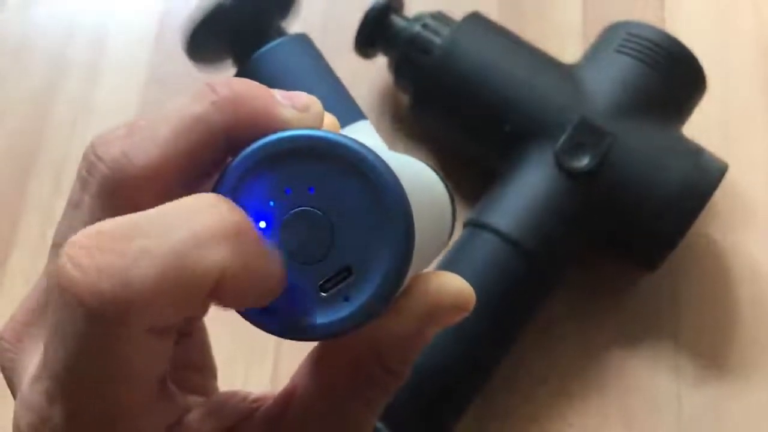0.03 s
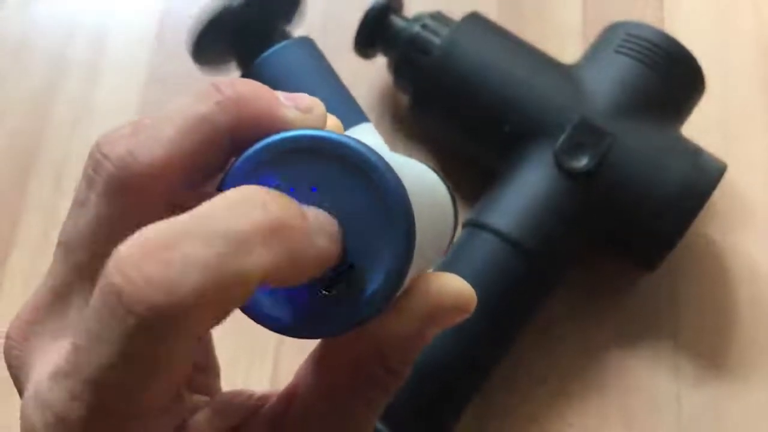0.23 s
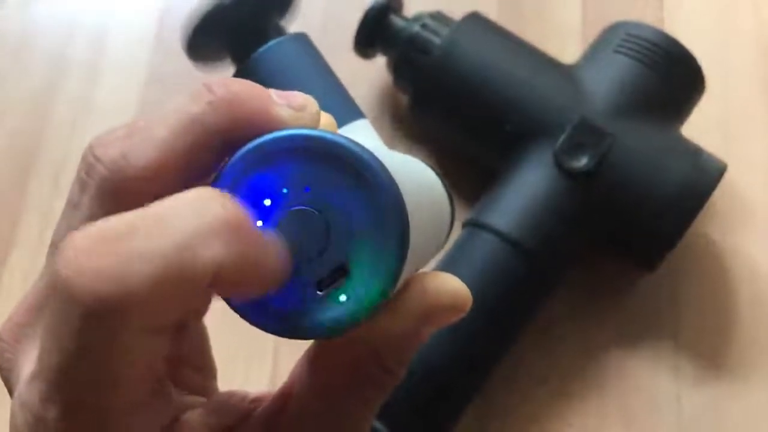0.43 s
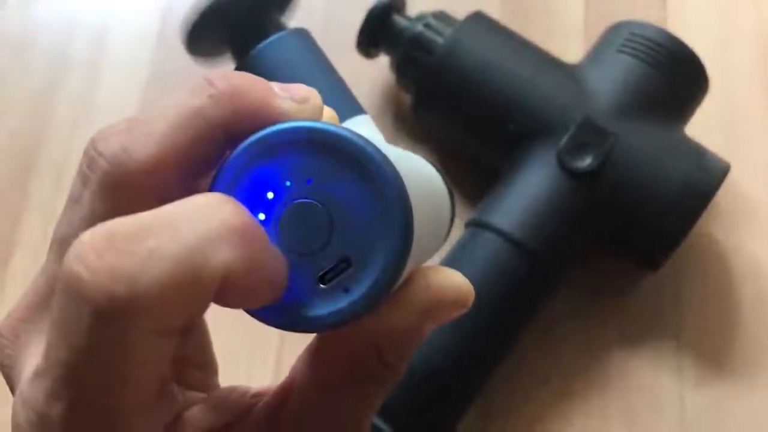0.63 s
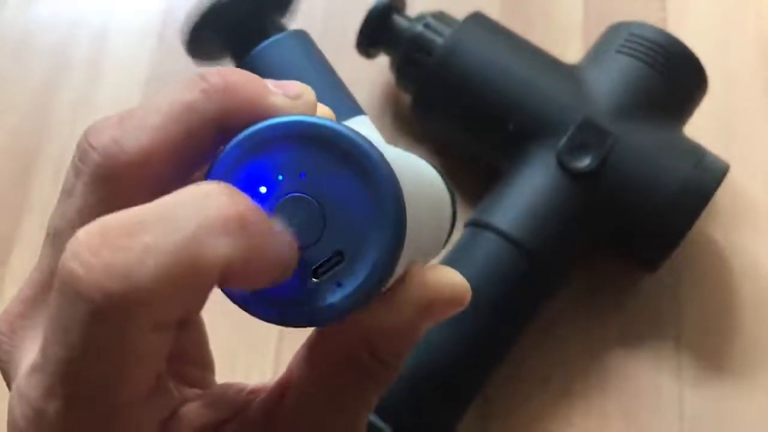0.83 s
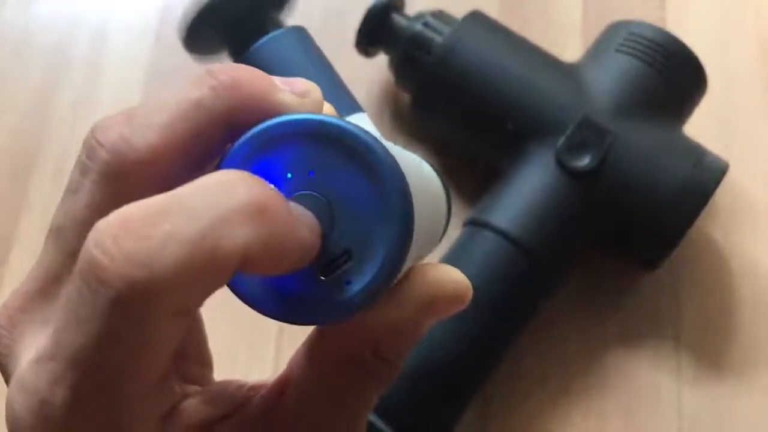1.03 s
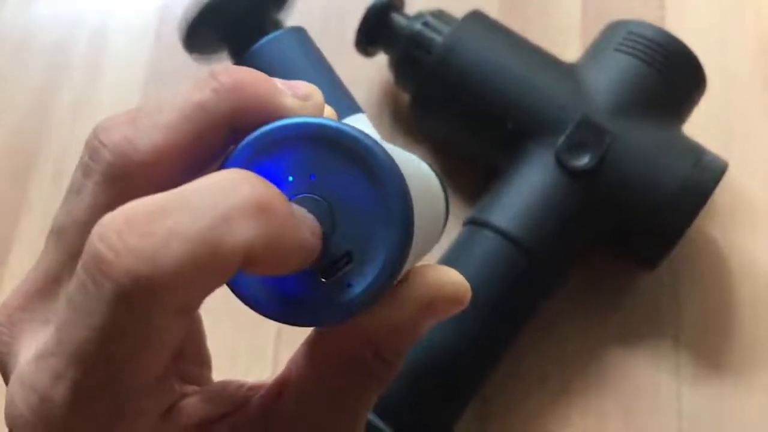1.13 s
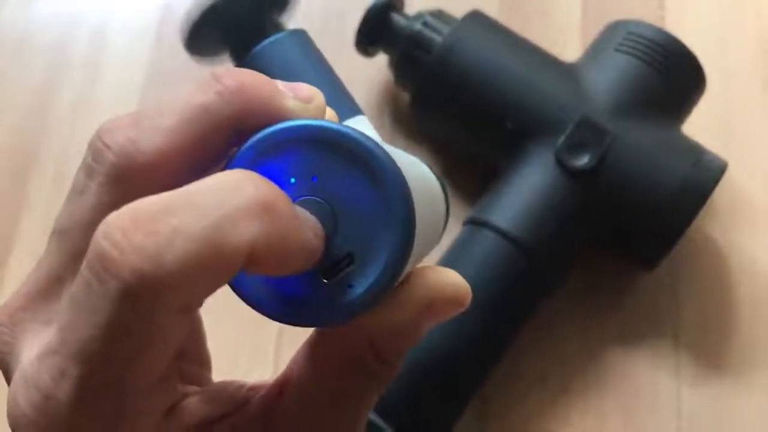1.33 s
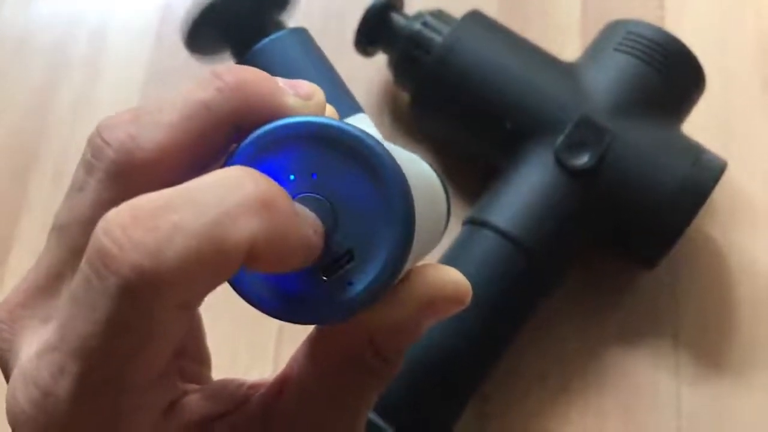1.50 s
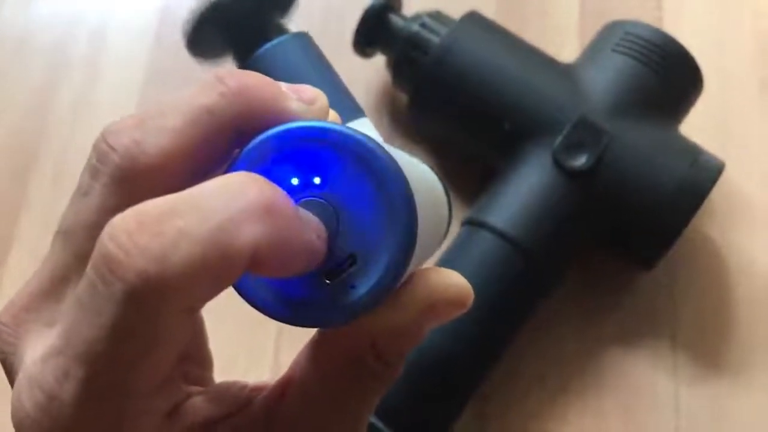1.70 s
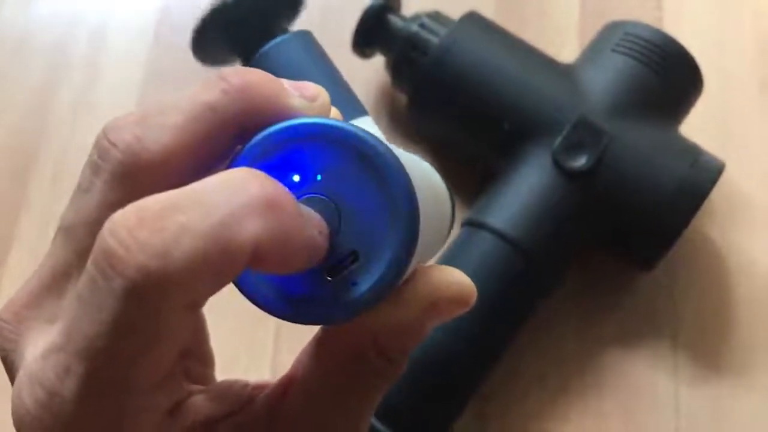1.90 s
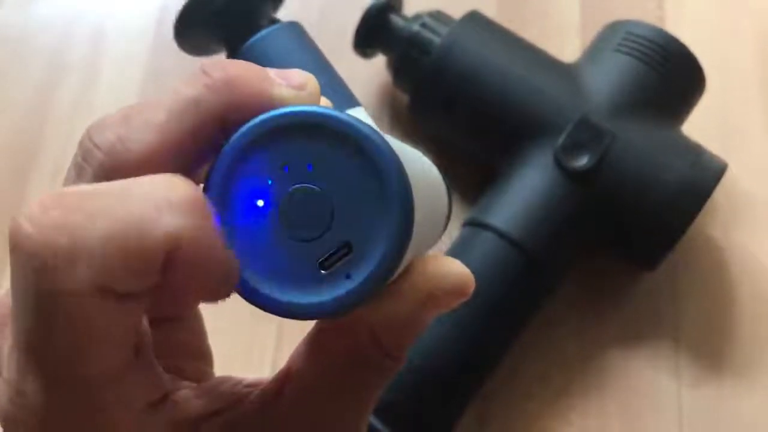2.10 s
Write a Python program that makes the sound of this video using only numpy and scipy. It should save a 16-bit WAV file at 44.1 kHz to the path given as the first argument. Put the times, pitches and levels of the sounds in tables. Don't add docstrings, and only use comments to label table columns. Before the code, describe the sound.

Handheld massage gun motor whirring with rapid knocking, one loud button click, then a quick wind-down

```python
import sys
import numpy as np
from scipy import signal
from scipy.fft import rfft, irfft
from scipy.io import wavfile

SR = 44100
rng = np.random.default_rng(int(sys.argv[2]) if len(sys.argv) > 2 else 0)


def decibels_to_gain(level_db):
    exponent = np.asarray(level_db, float) / 20
    return 10 ** exponent


def wav_record(signal):
    frames = np.transpose(np.atleast_2d(signal))
    bounded = np.clip(frames, -1, 1)
    quanta = np.round(bounded * 32767).astype(np.int16)
    wavfile.write(sys.argv[1], SR, quanta)


N = 94815

# frequency_hz, density_db
FLOOR_SPECTRUM = [(15, -66), (25, -6), (108, -7), (394, -12.5), (427, -13.5), (463, -14.5), (988, -17.5),
                  (1290, -21), (16000, -38.5)]
# frequency_hz, width_hz, level_db
HUM_BANDS = [(120, 22, -70), (76, 25, -73), (267, 15, -77), (980, 30, -75)]
# time_s, speed_turns_per_s
SHAFT_SPEED = [(0.0, 35.68), (0.1, 35.19), (0.2, 34.75), (0.3, 34.4), (0.4, 33.99), (0.5, 34.33),
               (0.65, 35.12), (0.8, 35.74), (1.0, 36.49), (1.2, 37.05), (1.4, 37.55), (1.62, 37.98),
               (1.7, 26.9), (1.78, 19.42), (1.86, 9.11), (1.95, -5.45)]
TONE_MULTIPLES = [21, 35, 37, 42, 44, 63, 84, 112, 116, 126, 168, 182, 196, 3]
# level_db, pressed_gain_db, waver_db
TONE_LEVELS = [(-72, 5, 1), (-62, -3, 1.5), (-65, 0, 1.5), (-48.5, 0, 1), (-59, 0, 3), (-72, 0, 1.5),
               (-66, -7, 1.5), (-68, 13, 1.5), (-84, 24.5, 2), (-76, -3, 2), (-79, 0, 2), (-88, 11, 2),
               (-79, 0, 2), (-72, 0, 2.5)]
KNOCK_PLACES = [(.545, 1), (.035, -1), (.66, 1), (.87, -1)]
# shell_db, thump_db
KNOCK_LEVELS = [
    (-38, -40),
    (-39.5, -47.5),
    (-46.5, -60.5),
    (-52, -51),
]
# frequency_hz, level_db, t60_s
THUMP_MODES = [(620, -1, .018), (860, 0, .022), (980, -2, .035), (1080, -6, .025)]
# frequency_hz, level_db, t60_s
SHELL_MODES = [(1270, -6, .02), (1580, -3, .03), (1850, -6, .014), (2350, -8, .018), (2750, -9, .014),
               (3200, 0, .013), (3750, -8, .012), (4750, -13, .01)]
# frequency_hz, width_hz, level_db
RATTLE_BANDS = [(646, 68, -13), (985, 43, -8.5), (1252, 450, -4.5), (1700, 276, -2), (1970, 200, -16.5),
                (2287, 180, -18), (2900, 612, -5.5), (3230, 900, -13), (3800, 86, -18.5)]
# frequency_hz, width_hz, level_db
FIZZ_BANDS = [(4290, 260, 5), (5100, 700, -5), (5850, 800, -5), (7250, 700, 0), (8050, 350, -5),
              (9200, 600, -10), (11900, 400, -16), (14000, 500, -16)]
# start_s, peak_db, pitch_factor, ring_factor, crack_db
CLICKS = [
    (.2461, -5.5, 1.0, 1.0, -19),
    (1.0315, -37, .92, 1.3, -14),
]
# start_s, peak_db, pitch_factor, ring_factor, crack_db
RELEASES = [
    (.4024, -22.5, 1.0, 1.0, -9),
    (.4063, -33, 1.07, 1.0, -8),
    (1.9824, -34.5, .9, 1.2, -3),
    (1.9875, -46, .74, 1.6, -3),
    (1.999, -53, .92, 1.5, -3),
]
# frequency_hz, level_db, t60_s
DOME_DOWN_MODES = [(270, -32, .025), (620, -33, .012), (1100, -25, .01), (1900, -23, .008),
                   (2870, -10, .011), (3830, -8, .011), (5170, -4, .014), (5900, -6, .007), (6450, 0, .008),
                   (7300, -10, .007)]
# frequency_hz, level_db, t60_s
DOME_UP_MODES = [(300, -25, .02), (1000, -15, .009), (2000, -16, .008), (3850, -7, .008), (5240, -4, .011),
                 (7970, 0, .012), (8500, -2, .016), (10800, -12, .011), (12400, -12, .01),
                 (15000, -14, .009)]


def evened(x):
    return x / np.sqrt(np.mean(x ** 2) + 1e-20)


def resonate(x, hz, width_hz):
    r = np.exp(-np.pi * width_hz / SR)
    pole = r * np.exp(2j * np.pi * hz / SR)
    return 2 * signal.lfilter([1 - r], [1, -pole], x).real


def noise_band(source, hz, width_hz):
    return evened(resonate(resonate(source, hz, width_hz), hz, 2 * width_hz))


def coloured(beat, bands):
    return evened(sum(decibels_to_gain(db) * noise_band(beat * rng.standard_normal(N), hz, width_hz)
                      for hz, width_hz, db in bands))


def drift(top_hz):
    return evened(resonate(resonate(rng.standard_normal(N), 0, top_hz), 0, top_hz))


def ring(modes, pitch=1, length=1, rise_s=0.0006):
    t = np.arange(3000) / SR
    x = np.zeros(3000)
    for k, (hz, db, t60_s) in enumerate(modes):
        decay = decibels_to_gain(db - 60 * t / (t60_s * length))
        x += (-1) ** k * decay * np.sin(2 * np.pi * hz * pitch * t)
    x *= np.sin(np.pi / 2 * np.minimum(t / rise_s, 1)) ** 2
    return x / abs(x).max()


def motion():
    start_turn = .02
    off_s, off_fade_s = 1.62, .005
    press_s, press_rise_s = .93, .3
    t = np.arange(N) / SR
    speed = np.maximum(np.interp(t, *np.transpose(SHAFT_SPEED)), 0)
    turns = start_turn + np.cumsum(speed) / SR
    drive = np.exp(-np.maximum(t - off_s, 0) / off_fade_s)
    pressed = np.clip((t - press_s) / press_rise_s, 0, 1)
    return t, speed / speed.max(), turns, drive, pressed


def floor():
    floor_db, waver_db = -63, 0.27
    hz = np.fft.rfftfreq(N, 1 / SR)
    f, db = np.transpose(FLOOR_SPECTRUM)
    spectrum = decibels_to_gain(np.interp(np.log(hz + 1), np.log(f + 1), db))
    tone = irfft(rfft(rng.standard_normal(N)) * spectrum, N)
    hum = sum(decibels_to_gain(level_db) * noise_band(rng.standard_normal(N), centre_hz, width_hz)
              for centre_hz, width_hz, level_db in HUM_BANDS)
    return decibels_to_gain(floor_db + waver_db * drift(top_hz=1.5)) * evened(tone) + hum


def whine():
    cap_hz, cap_width_hz = 1570, 115
    lock_turn = .67
    phase_wander_turns = .025
    load_swing, load_place = .3, .6
    t, speed, turns, drive, pressed = motion()
    shaft_hz = np.gradient(turns) * SR
    since_knock = turns - KNOCK_PLACES[0][0]
    out = np.zeros(N)
    for k, (db, press_db, waver_db) in zip(TONE_MULTIPLES, TONE_LEVELS):
        main = abs(k - 43) < 2
        lift = 1 / np.sqrt(1 + ((k * shaft_hz - cap_hz) / cap_width_hz * 2) ** 2) if main else 1
        level = decibels_to_gain(db + press_db * pressed + waver_db * drift(top_hz=14)) * lift * np.sqrt(2)
        start = lock_turn if main else rng.random()
        phase_turns = k * since_knock + start + phase_wander_turns * drift(top_hz=29.4)
        out += level * np.sin(2 * np.pi * phase_turns)
    load = 1 + load_swing * np.cos(2 * np.pi * (turns - load_place))
    return out * drive * load


def crank():
    speed_law, rise_s = .75, .0006
    spread_db, jitter_s = 1.2, .00002
    thump_lead_s = .0028
    thump_db, thump_press_db, thump_drive_db = -11.25, 3, 4.5
    t, speed, turns, drive, pressed = motion()
    taps, thumps = np.zeros(N), np.zeros(N)
    for (place, sign), (shell_db, body_db) in zip(KNOCK_PLACES, KNOCK_LEVELS):
        at = np.interp(np.arange(turns[-1] - place) + place, turns, t)
        chance = rng.standard_normal((80, 2))[:len(at)]
        size = sign * decibels_to_gain(spread_db * chance[:, 0]) * np.interp(at, t, speed) ** speed_law
        at = at + jitter_s * chance[:, 1]
        tap_index = np.clip((at * SR).astype(int), 0, N - 1)
        thump_index = np.clip(((at - thump_lead_s) * SR).astype(int), 0, N - 1)
        taps[tap_index] += size * decibels_to_gain(shell_db)
        thumps[thump_index] += size * decibels_to_gain(body_db)
    thumps *= decibels_to_gain(thump_db + thump_press_db * pressed + thump_drive_db * drive)
    shell = signal.oaconvolve(taps, ring(SHELL_MODES, rise_s=rise_s))
    body = signal.oaconvolve(thumps, ring(THUMP_MODES, rise_s=2 * rise_s))
    return (shell + body)[:N]


def rattle():
    rattle_db, rattle_drive_db, rattle_law = -58, 3, 0.89
    fizz_db, fizz_drive_db, fizz_law = -62, 4, 1.8
    beat_depth, air_db = 0.38, -5.5
    t, speed, turns, drive, pressed = motion()
    beat = 1 + beat_depth * np.cos(2 * np.pi * (turns - .06)) ** 6
    body = decibels_to_gain(rattle_db + rattle_drive_db * drive) * speed ** rattle_law * coloured(beat, RATTLE_BANDS)
    bright = np.diff(beat * rng.standard_normal(N), prepend=0)
    air = decibels_to_gain(air_db) * evened(bright + beat * rng.standard_normal(N))
    fizz_level = decibels_to_gain(fizz_db + fizz_drive_db * drive) * speed ** fizz_law
    fizz = fizz_level * (coloured(beat, FIZZ_BANDS) + air)
    return decibels_to_gain(.6 * drift(top_hz=6)) * (body + fizz)


def room(x):
    level_db, t60_s, top_hz = -25, .25, 7400
    t = np.arange(SR // 3) / SR
    tail = resonate(rng.standard_normal(len(t)), 0, top_hz) * decibels_to_gain(-60 * t / t60_s)
    tail *= t > .004
    return decibels_to_gain(level_db) * signal.fftconvolve(x, tail / np.linalg.norm(tail))[:N]


def button(rows, modes):
    crack_hz, crack_width_hz, crack_t60_s, rise_s = 7200, 6000, .015, .0004
    t = np.arange(3000) / SR
    out = np.zeros(N + 3000)
    for start_s, peak_db, pitch, length, crack_db in rows:
        crack = resonate(rng.standard_normal(3000), crack_hz, crack_width_hz)
        crack *= decibels_to_gain(crack_db - 60 * t / (crack_t60_s * length))
        snap = ring(modes, pitch, length, rise_s) + np.minimum(t / rise_s, 1) * crack
        out[round(start_s * SR):][:3000] += decibels_to_gain(peak_db) * snap
    return out[:N]


def scene():
    radiation = signal.butter(5, 540, "high", fs=SR, output="sos")
    shell = signal.sosfilt(radiation, crank() + rattle())
    gun = whine() + shell + button(CLICKS, DOME_DOWN_MODES) + button(RELEASES, DOME_UP_MODES)
    return (gun + room(gun) + floor())[None]


def band_limit(x):
    return signal.sosfilt(signal.butter(12, 16800, fs=SR, output="sos"), x)


def record(dry):
    x = signal.lfilter(*signal.butter(2, 20, "high", fs=SR), dry)
    x = signal.oaconvolve(x, signal.firwin(255, 15780, fs=SR)[None], "same")
    return band_limit(x)


dry = scene()
out = record(dry)
wav_record(out)
```